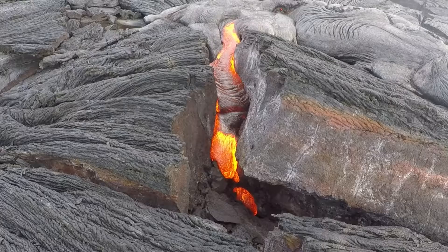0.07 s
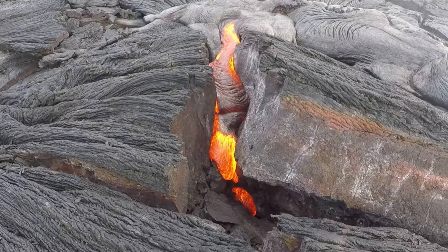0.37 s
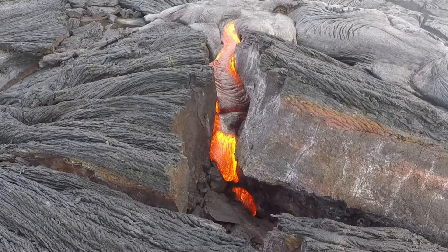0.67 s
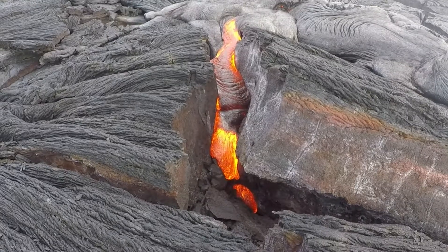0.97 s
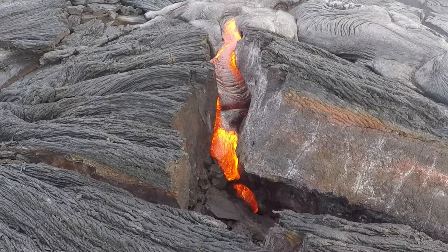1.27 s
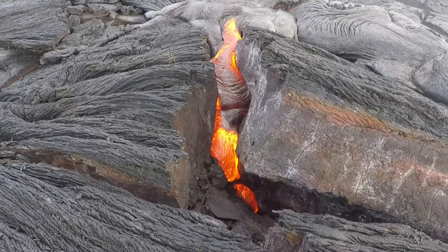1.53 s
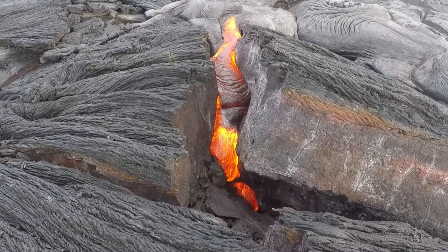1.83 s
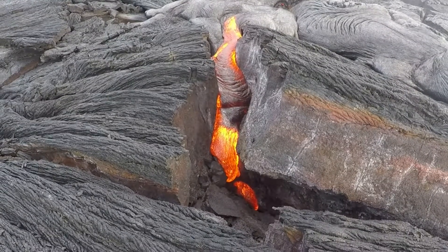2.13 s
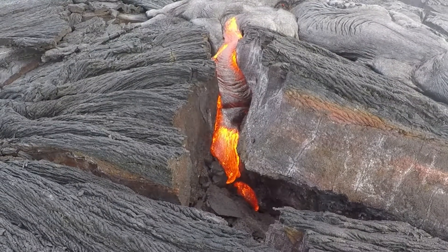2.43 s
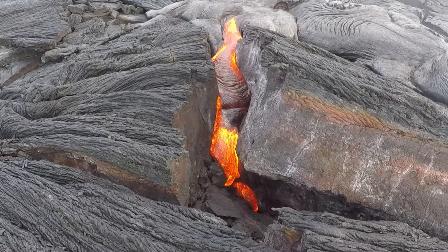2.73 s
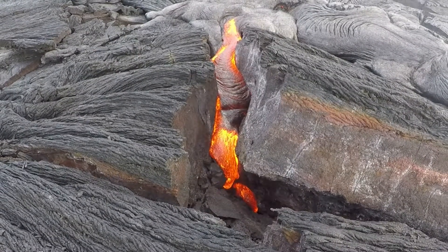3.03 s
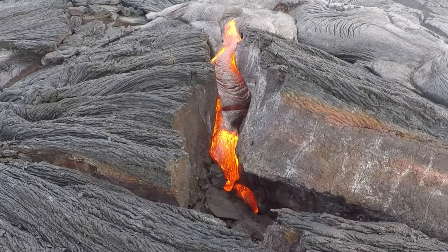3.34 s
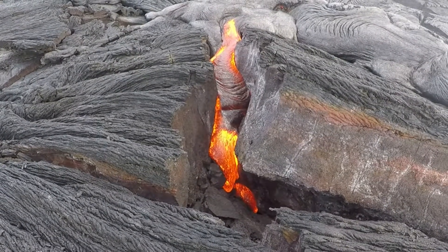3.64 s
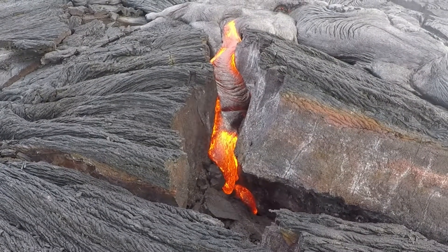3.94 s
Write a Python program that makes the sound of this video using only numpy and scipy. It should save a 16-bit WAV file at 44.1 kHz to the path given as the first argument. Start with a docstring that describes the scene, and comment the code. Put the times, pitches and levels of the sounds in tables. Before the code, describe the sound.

Gusty wind thumps on the microphone while cooling lava ticks and snaps.

```python
"""Wind on a lava field

Gusts buffet a microphone, mostly at the left port; stronger gusts sound brighter, and two briefly throb.
The brittle rock crust ticks and snaps, and now and then crumbles in a short gritty crunch.
A few dull scuffs rub close by. A low rumble and a faint hiss of air lie underneath."""
import sys
import numpy as np
from scipy import signal
from scipy.fft import rfft, irfft, next_fast_len
from scipy.io import wavfile
from scipy.ndimage import uniform_filter1d, map_coordinates

SR = 44100
rng = np.random.default_rng(int(sys.argv[2]) if len(sys.argv) > 2 else 0)


def unload_wav(signal):
    """Save mono or channel-first audio to the path in sys.argv[1] as 16-bit WAV at rate SR, clipped to [-1, 1]."""
    wavfile.write(
        sys.argv[1],
        SR,
        np.round(np.clip(np.atleast_2d(signal).T, -1, 1) * 32767).astype(np.int16),
    )


N = 176400

# Colour of the distant air. Each row: frequency in Hz, gain in dB.
AIR_EQ = [(40, 7), (300, 2.5), (750, 3), (1500, -5.5), (2000, -7), (2500, -13), (3300, -12), (4700, -16.5),
          (7200, -14.5), (9500, -16.5), (11500, -22), (13500, -27.5), (15000, -53), (16000, -75)]
# Fader for the air. Each row: time in seconds, level in dB.
AIR_FADER = [(0, -46.5), (4, -45)]
# Stereo image of the air. Each row: frequency in Hz, left-right likeness from -1 to 1.
AIR_IMAGE = [(150, -0.048), (550, -0.66), (1000, -0.75), (2000, -0.48), (3200, 0.44), (4800, 0.098),
             (6500, 0.035), (9000, -0.14), (13000, 0.27)]
# Colour of the rumble. Each row: frequency in Hz, gain in dB.
RUMBLE_EQ = [(10, -28), (25, -6.5), (45, 1), (75, -1.5), (120, -8), (190, -15), (300, -31), (600, -44),
             (1500, -66), (5000, -120)]
# Fader for the rumble. Each row: time in seconds, relative level in dB.
RUMBLE_FADER = [(0, -25.5), (.06, -48), (.1, -31.5), (.48, -25), (.55, -28), (.8, -31), (1.1, -36),
                (1.25, -25.5), (1.42, -25), (1.47, -33), (1.54, -25), (1.66, -37), (1.73, -26), (1.78, -34),
                (1.84, -29), (1.89, -40), (1.94, -31.5), (2.07, -36.5), (2.13, -27.5), (2.2, -33),
                (2.36, -25.5), (2.42, -30), (2.68, -30), (2.87, -27), (2.96, -24), (3.05, -23.5),
                (3.12, -28.5), (3.2, -27.5), (3.31, -31), (3.6, -28.5), (3.84, -25), (4, -26)]

# Colour of all breaking crust. Each row: frequency in Hz, gain in dB.
CRUST_EQ = [(150, 12.5), (650, 8), (1050, 4.5), (1650, 9.5), (2350, -2), (3150, 3), (3900, -3.5),
            (4700, -3.5), (5700, 0.5), (7400, 2), (9200, -9), (11500, -20.5), (13000, -22), (14600, -31),
            (16300, -52)]
# Stereo image of nearby cracks. Each row: frequency in Hz, left-right likeness.
CRUST_IMAGE = [(550, 0.1), (2000, -0.39), (3200, 0.31), (4300, 0.63), (5800, -0.22), (8000, -0.63),
               (13000, 0.46)]
# Faint ticks have little body and little top. Each row: frequency in Hz, gain in dB.
TICK_EQ = [(1500, -4.5), (6000, -0.5), (12500, -2.5)]
# Fader for the ticking. Each row: time in seconds, relative level in dB.
TICK_FADER = [(0, 5.5), (1.5, -1.5), (1.9, 2.5), (3.3, 6.5), (4, -5)]
# Close scuffs. Each row: start in seconds, length in seconds, level in dB.
SCUFF_CUES = [(1.382, 0.024, -32.5), (2.594, .018, -32), (2.611, 0.22, -41)]
# Dull colour of a scuff. Each row: frequency in Hz, gain in dB.
SCUFF_EQ = [(250, 3), (600, -1), (950, 8), (1400, -4.5), (2200, -10.5), (5000, -64)]
# Crumbling grit. Each row: start in seconds, length in seconds, level in dB, leftward pan in dB.
CRUNCH_CUES = [(0.036, 0.031, -44.5, -2), (1.812, 0.05, -45, 3), (2.987, 0.12, -45, 4),
               (3.038, 0.065, -44.5, 2), (3.217, 0.032, -43, 4), (3.411, 0.089, -44, 1),
               (3.485, 0.05, -34.5, 4), (3.544, 0.053, -38, 2), (3.587, 0.076, -39.5, 0.5)]
# Small fractures have extra sparkle. Each row: frequency in Hz, gain in dB.
CRUNCH_EQ = [(1000, 0.5), (2000, -1.5), (4000, 0.5), (7500, -2.5), (12500, 3)]
# Stereo image of close crumbling. Each row: frequency in Hz, left-right likeness.
CRUNCH_IMAGE = [(900, -0.41), (1900, -0.68), (3500, 0.38), (7000, -.5), (13000, .1)]
# Snaps of the crust. Each row: start in seconds, relative level in dB, treble in dB, body in dB,
# leftward pan in dB, ring pitch in Hz.
SNAP_CUES = [(0.073, -39.5, 25, -16, -4, 7000), (0.0983, -25.5, 3, -26, -1, 13400),
             (.1195, -31.5, -14, 14, -3, 980), (0.2145, -33, 0, -5, -2, 4650),
             (0.3299, -34, 12, -1, 13, 7040), (0.9872, -39.5, 24, -14, -6, 7500),
             (1.0457, -34.5, 19, -14, 8, 7760), (1.054, -34, 14, -14, -7, 6260),
             (1.493, -37, -21, -10, -1, 3420), (1.6475, -42, 16, -10, 5, 14300),
             (1.662, -33, -9, -1, 4, 1640), (1.834, -34.5, -1, -1, -1, 4040),
             (1.846, -34.5, -2, 3, 12, 4240), (1.9821, -35.5, -2, 1, 2, 4350),
             (2.2215, -37.5, -10, -26, -3, 3220), (2.3449, -32, -7.5, -20, 3, 3560),
             (2.5892, -39.5, -16, -18, 4, 4400), (2.626, -29, -21, -2.5, 4, 4000),
             (2.9362, -34, -19, -6, 3, 4220), (3.0222, -27, -5, 4.5, 1, 1940), (3.037, -35, 2, 1, 0, 5600),
             (3.0578, -29.5, 3, -10, -11, 6740), (3.138, -47, 4, 1, -.5, 3160),
             (3.2415, -28.5, 4, 6, -1, 5670), (3.3159, -33, -1, 1, -6, 7500),
             (3.3627, -17, 0, 4, -2.5, 7340), (3.484, -33, 2, -8, 0, 4760),
             (3.5027, -28.5, 10, 2, -3, 1620), (3.717, -39.5, 14, 3, 5, 7000),
             (3.755, -23.5, -0.5, -5, 2.5, 5550)]
# Ring of a rock plate. Each row: pitch in Hz, relative level in dB, seconds to fall 60 dB.
PLATE_MODES = [(670, -2.5, 0.018), (1640, -2.5, 0.02), (3197, -2.5, 0.034), (5240, -9, 0.045),
               (7190, 8, 0.017)]

# Throbs in the gusts. Each row: start in seconds, length in seconds, pitch in Hz, level in dB,
# leftward pan in dB.
THROB_CUES = [(3.005, 0.1, 120.2, -24, 2), (3.15, .07, 167.1, -21.5, 14)]
# Strength of the wind at the microphone. Each row: time in seconds, relative level in dB.
GUST_FADER = [(0, -47), (.11, -90), (.15, -34.5), (.23, -30), (.26, -34), (.29, -28), (.33, -36.5),
              (.37, -23), (.48, -24.5), (.54, -44), (.64, -49), (.76, -30.5), (.79, -45), (.9, -58.5),
              (1.1, -57.5), (1.28, -41.5), (1.4, -37.5), (1.5, -51.5), (1.52, -26.5), (1.548, -23.5),
              (1.565, -38.5), (1.7, -49.5), (1.8, -65), (2.07, -78), (2.17, -39.5), (2.26, -54),
              (2.66, -66), (2.715, -31.5), (2.75, -40.5), (2.81, -28), (2.84, -35), (2.86, -19.5),
              (2.9, -24.5), (2.93, -22), (2.95, -43), (3.06, -32), (3.12, -42.5), (3.16, -23.5),
              (3.19, -21), (3.207, -21), (3.23, -39.5), (3.36, -60.5), (3.46, -41), (3.54, -66),
              (3.6, -35.5), (3.68, -50), (3.78, -39), (4, -50)]
# How sharply the gusts strike. Each row: time in seconds, tilt in dB per octave.
GUST_TILT = [(0, -2.5), (.25, 1), (.42, 1.5), (.75, -0.8), (1.25, 2), (1.41, 4), (1.54, 2), (1.7, 4.5),
             (2.2, -2), (2.75, 0.5), (2.9, -2.5), (3.19, 0), (3.6, -2.5), (4, 5)]
# Colour of the buffeting at full strength. Each row: frequency in Hz, gain in dB.
BUFFET_EQ = [(20, -7), (80, -2.5), (170, 3), (280, 0), (500, -8.5), (750, -17), (1050, -23.5), (1600, -42),
             (3000, -57), (10000, -110)]
# How each band opens with the wind. Each row: frequency in Hz, dB gained per dB of gust.
BUFFET_GROWTH = [(100, 0.5), (200, 0.84), (450, 1), (900, 1.5)]
# The gusts favour the left port. Each row: frequency in Hz, leftward pan in dB.
BUFFET_PAN = [(80, 13), (200, 9.5), (400, 9), (800, 2.5), (1500, 2)]
# Stereo image of the buffeting. Each row: frequency in Hz, left-right likeness.
BUFFET_IMAGE = [(100, -0.2), (250, -0.33), (500, -0.81), (1200, -0.87)]


def amp(db):
    """Decibels to gain."""
    return 10 ** (np.asarray(db) / 20)


def unit(x):
    """Scale to rms 1."""
    return x / np.sqrt(np.mean(x ** 2) + 1e-20)


def along(points, hz):
    """Read (Hz, value) points on a log frequency axis."""
    freqs, values = np.transpose(points)
    return np.interp(np.log(hz + 1), np.log(freqs + 1), values)


def curve(rows):
    """An automation lane: one value per sample from (seconds, value) rows."""
    return np.interp(np.arange(N) / SR, *np.transpose(rows))


def wobble(rate):
    """A smooth random curve, rate knots a second."""
    return map_coordinates(rng.standard_normal(4096), [np.arange(N) * rate / SR], mode="wrap")


def arch(start, length):
    """A rounded swell from 0 to 1 and back."""
    progress = np.clip((np.arange(N) / SR - start) / length, 0, 1)
    return np.sqrt(abs(np.sin(np.pi * progress)))


def filtered(x, response):
    """Equalise x with a gain given as a function of Hz."""
    n = x.shape[-1]
    padded = next_fast_len(n + 4096)
    return irfft(rfft(x, padded) * response(np.fft.rfftfreq(padded, 1 / SR)), padded)[..., :n]


def pan(db):
    """Constant-power gains that put left db above right."""
    gains = amp(np.array([db, -db]).reshape(2, -1) / 2)
    return gains / np.sqrt(np.mean(gains ** 2, axis=0))


def stereo(pair, colour_db, image):
    """Colour two unrelated signals and blend them as mid and side, rms 1."""
    def response(hz):
        width = np.arccos(np.clip(along(image, hz), -.99, .99)) / 2
        return amp(colour_db(hz)) * [np.cos(width), np.sin(width)]
    mid, side = filtered(pair, response)
    return unit(np.array([mid + side, mid - side]))


def rush(eq, image):
    """Coloured stereo noise of rms 1."""
    return stereo(rng.standard_normal((2, N)), lambda hz: along(eq, hz), image)


def add(out, start, sound):
    """Mix a sound in at a start time in seconds."""
    part = out[:, max(0, round(start * SR)):][:, :sound.shape[1]]
    part += sound[:, :part.shape[1]]


def air():
    """Wind hisses over the distant ground."""
    return rush(AIR_EQ, AIR_IMAGE) * amp(curve(AIR_FADER) + 0.06 * wobble(13.4))


def rumble(likeness=.72, lumps_db=3, trim_db=0.66):
    """Large slow eddies press on both ports nearly alike, in lumps."""
    noise = rush(RUMBLE_EQ, [(60, likeness)]) * amp(lumps_db * wobble(50))
    running_rms = np.sqrt(abs(uniform_filter1d(np.mean(noise ** 2, axis=0), size=5000)))
    return noise / running_rms * amp(curve(RUMBLE_FADER) + trim_db) * pan(db=1.3)


def crust_tone(pair, eq, image):
    """Give two noises the colour of breaking crust, with a further EQ on top."""
    return stereo(pair, lambda hz: along(CRUST_EQ, hz) + along(eq, hz), image)


def grit(per_second, spread_db, t60, eq, image):
    """Tiny dry fractures at random moments, a few much larger than the rest."""
    hits = rng.random(N) < per_second / SR
    sizes = amp(spread_db * np.minimum(rng.exponential(size=N), 4))
    power_decay = amp(-120 * np.arange(2048) / SR / t60)
    power = signal.fftconvolve((hits * sizes) ** 2, power_decay)[:N]
    return crust_tone(np.sqrt(abs(power)) * rng.standard_normal((2, N)), eq, image)


def ticks(trim_db=-57):
    """The crust ticks faintly all the time."""
    grains = grit(per_second=200, spread_db=4, t60=0.0044, eq=TICK_EQ, image=CRUST_IMAGE)
    return amp(trim_db + curve(TICK_FADER)) * grains


def scuffs(likeness=-.85, rough_db=2):
    """Dull rubbing, so near that it drives the two ports in opposite directions."""
    swell = sum(amp(db) * arch(start, length) for start, length, db in SCUFF_CUES)
    return swell * rush(SCUFF_EQ, [(1000, likeness)]) * amp(rough_db * wobble(200))


def crunches():
    """Dense grains swell and fade as a bit of crust crumbles."""
    swell = sum(amp(db) * arch(start, length) * pan(pan_db) for start, length, db, pan_db in CRUNCH_CUES)
    return swell * grit(per_second=1900, spread_db=3, t60=0.0022, eq=CRUNCH_EQ, image=CRUNCH_IMAGE)


def mode(t, hz, t60):
    """A dying tone of the rock, reaching the two ports out of step."""
    phase_gap = np.arccos(np.clip(along(CRUST_IMAGE, hz), -1, 1)) * np.array([[0], [1]])
    return np.sqrt(2) * np.sin(2 * np.pi * (hz * t + rng.random()) + phase_gap) * amp(-60 * t / t60)


def snaps(trim_db=-4, plate_db=4, plate_growth=0.76):
    """Each snap cracks, rings briefly and scatters off the rock; big ones ring their plate the most."""
    rise_s, burst_t60 = 0.00013, 0.012
    scatter_db, scatter_t60 = -9.5, 0.061
    crack_db, crack_hold_s, crack_t60 = 0.5, 0.00075, 0.0019
    out, t = np.zeros((2, N)), np.arange(4096) / SR
    rise = 1 - np.exp(-t / rise_s)
    fall = amp(-60 * t / burst_t60) + amp(scatter_db - 60 * t / scatter_t60)
    crack_fall = amp(crack_db - 60 * np.maximum(t - crack_hold_s, 0) / crack_t60)
    for start, db, treble_db, body_db, pan_db, ring_hz in SNAP_CUES:
        eq = [(1700, body_db), (3500, 0), (8000, treble_db), (13500, 1.25 * treble_db)]
        burst = crust_tone(rng.standard_normal((2, len(t))), eq, CRUST_IMAGE)
        crack = filtered(burst, lambda hz: along([(4000, 0.24), (12000, 1.0)], hz)) * crack_fall
        ring = amp(-7) * mode(t, ring_hz, t60=0.015)
        plate = sum(amp(level + along(eq, hz)) * mode(t, hz, t60) for hz, level, t60 in PLATE_MODES)
        plate *= amp(plate_db + plate_growth * db)
        snap = crack + rise * (burst * fall + ring + plate)
        add(out, start, snap * amp(db + trim_db) * pan(pan_db))
    return out


def throbs(wander=0.1236):
    """For a moment the eddies shed in step and thump at a wandering low pitch."""
    out = np.zeros((2, N))
    for start, length, hz, db, pan_db in THROB_CUES:
        cycles = np.cumsum(hz * (1 + wander * wobble(90))) / SR
        out += np.sqrt(2) * np.sin(2 * np.pi * cycles) * arch(start, length) * amp(db) * pan(pan_db)
    return out


def buffet(trim_db=-18.5, full_gust_db=-26, flutter_db=1, eddy_db=2.5, pivot_hz=282):
    """Eddies beat on the ports: as the wind rises, the higher octaves grow fastest."""
    gust_db = curve(GUST_FADER) - full_gust_db + flutter_db * wobble(45)
    noise = filtered(rush(BUFFET_EQ, BUFFET_IMAGE), lambda hz: pan(along(BUFFET_PAN, hz)))
    octaves_hz = 100 * 2. ** np.arange(5)
    out = np.zeros((2, N))
    for centre, share in zip(octaves_hz, np.eye(len(octaves_hz))):
        band = filtered(noise, lambda hz: along(np.c_[octaves_hz, share], hz))
        tilt_db = curve(GUST_TILT) * np.log2(centre / pivot_hz)
        out += band * amp(along(BUFFET_GROWTH, centre) * gust_db + tilt_db + eddy_db * wobble(110))
    return amp(trim_db) * out


def scene():
    """The mix: wind on the microphone over the crackling rock."""
    return buffet() + throbs() + rumble() + air() + ticks() + snaps() + crunches() + scuffs()


def record(dry):
    """The microphone rounds off the highest peaks and keeps nothing above its band limit."""
    overload_db, top_hz = -2.5, 16300
    rounded = dry / (1 + (dry / amp(overload_db)) ** 4) ** .25
    return filtered(rounded, lambda hz: hz < top_hz)


dry = scene()
out = record(dry)
unload_wav(out)
```